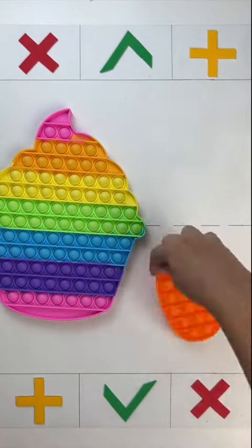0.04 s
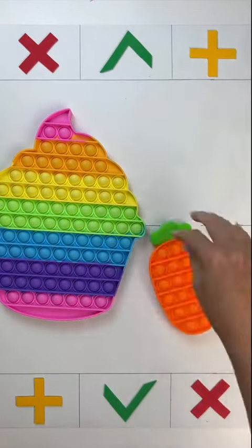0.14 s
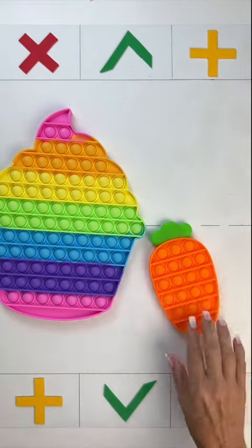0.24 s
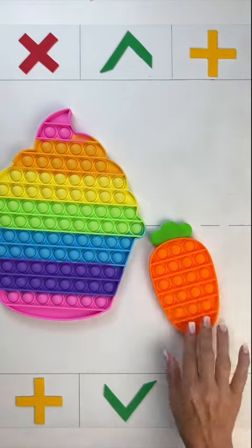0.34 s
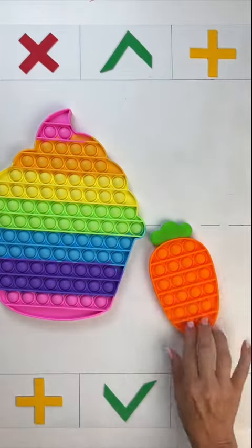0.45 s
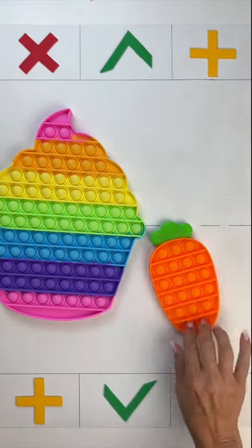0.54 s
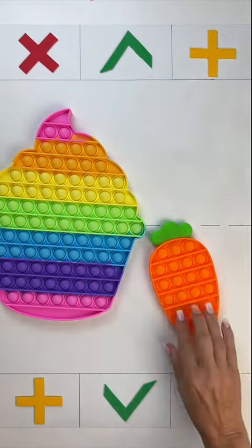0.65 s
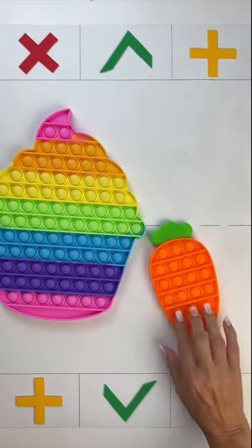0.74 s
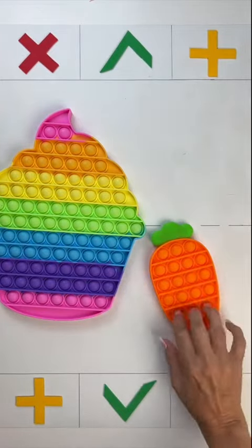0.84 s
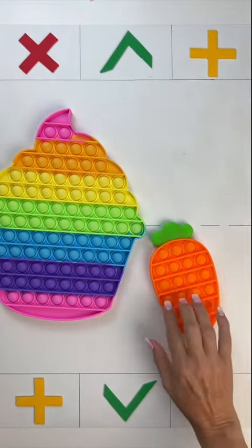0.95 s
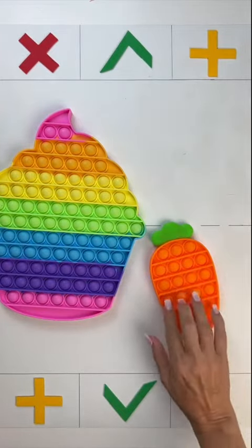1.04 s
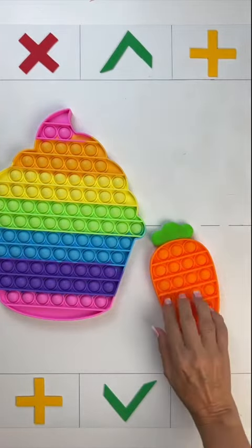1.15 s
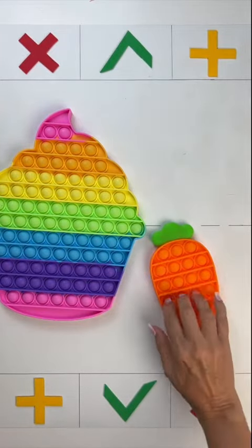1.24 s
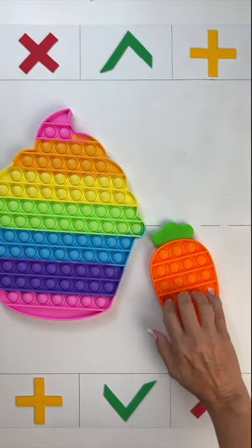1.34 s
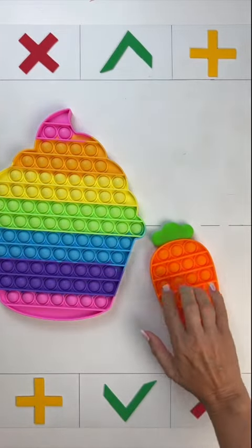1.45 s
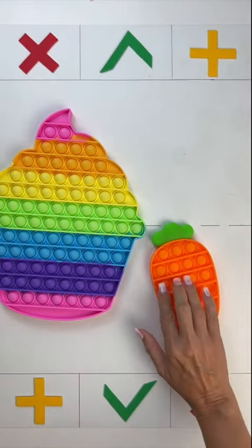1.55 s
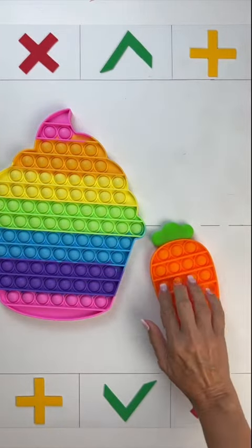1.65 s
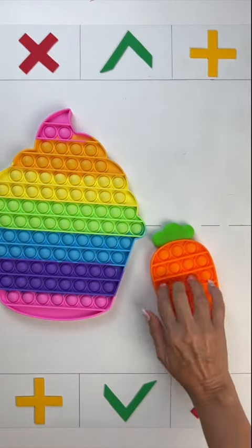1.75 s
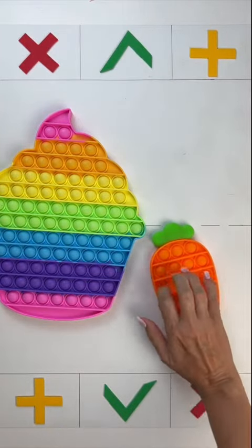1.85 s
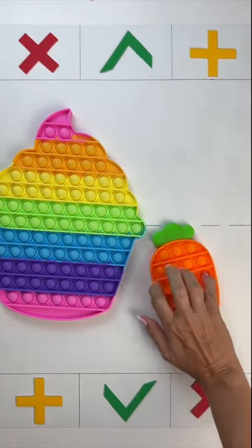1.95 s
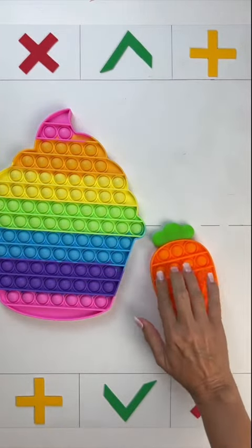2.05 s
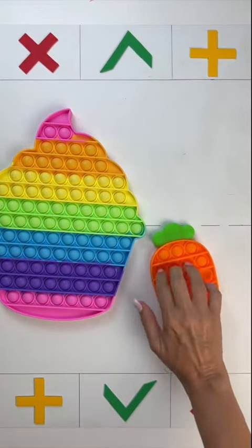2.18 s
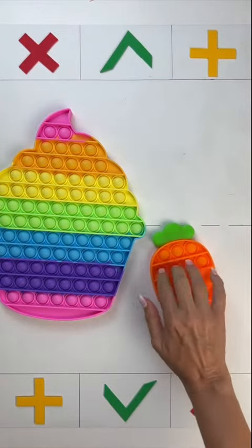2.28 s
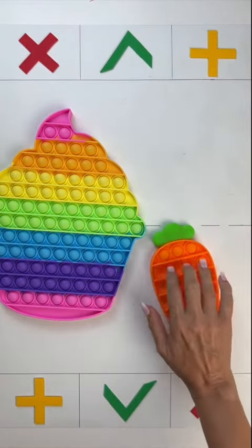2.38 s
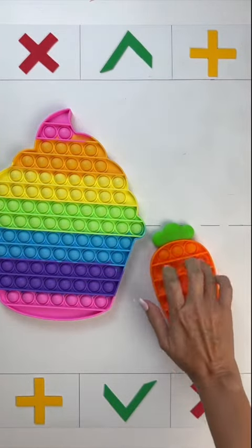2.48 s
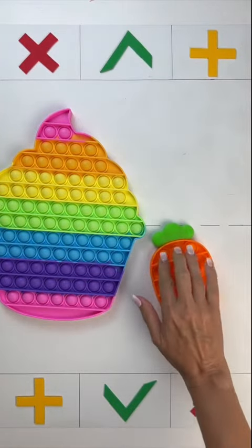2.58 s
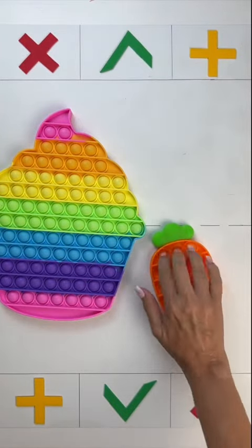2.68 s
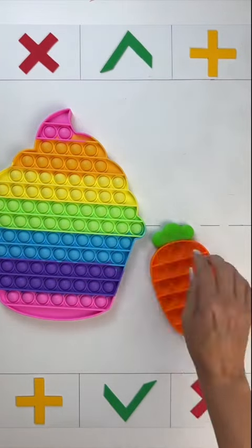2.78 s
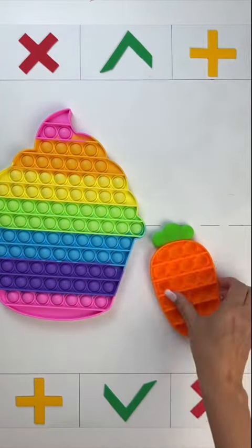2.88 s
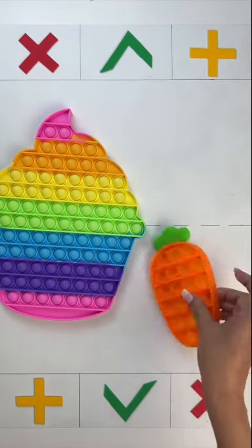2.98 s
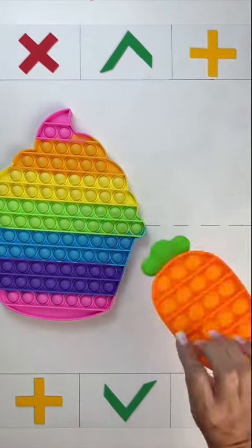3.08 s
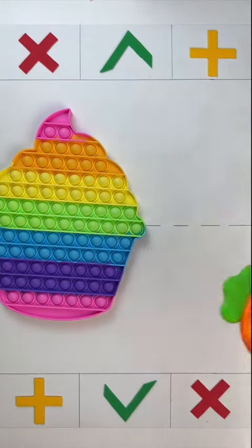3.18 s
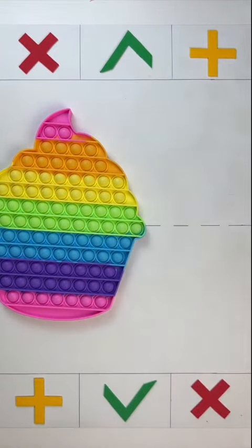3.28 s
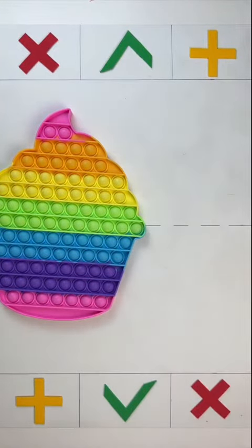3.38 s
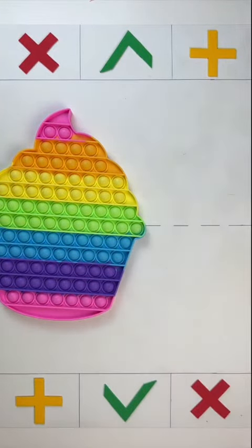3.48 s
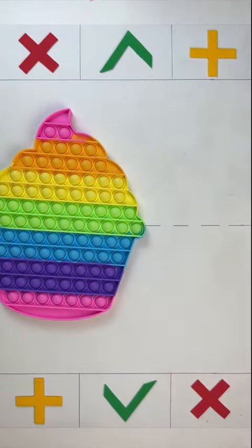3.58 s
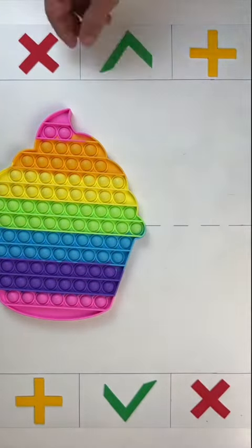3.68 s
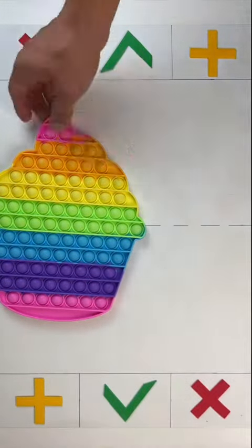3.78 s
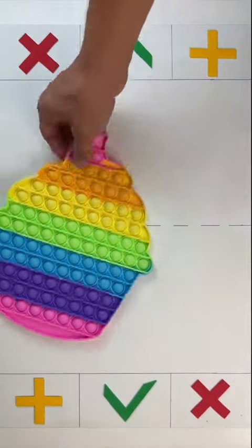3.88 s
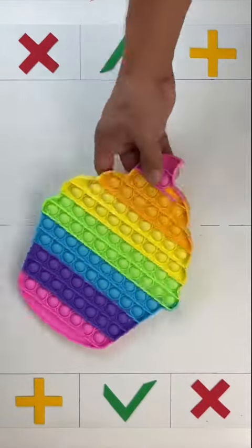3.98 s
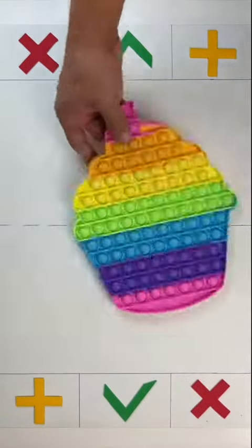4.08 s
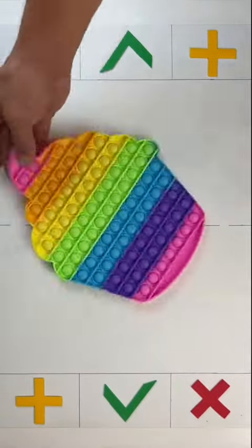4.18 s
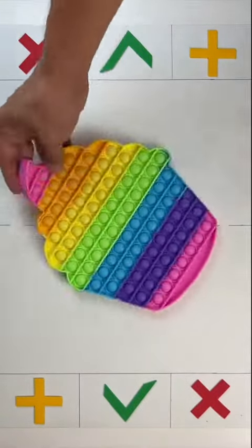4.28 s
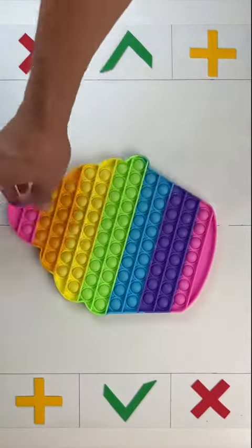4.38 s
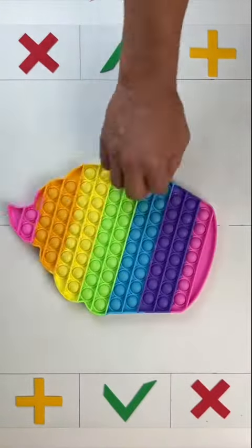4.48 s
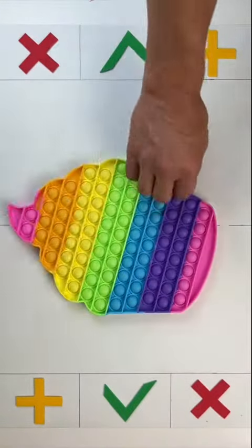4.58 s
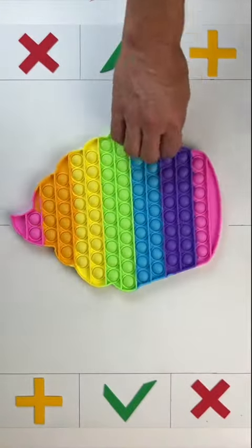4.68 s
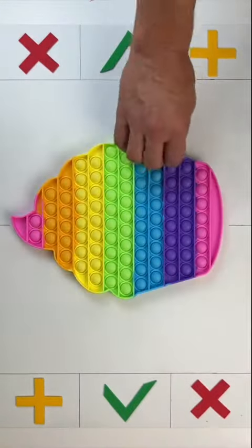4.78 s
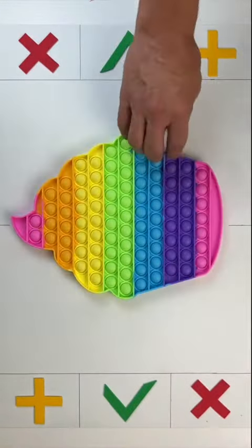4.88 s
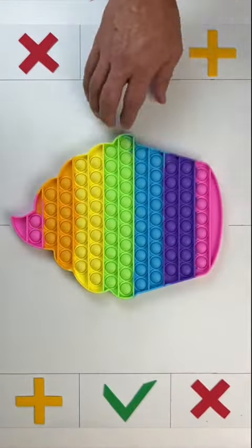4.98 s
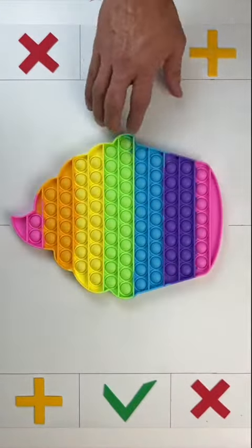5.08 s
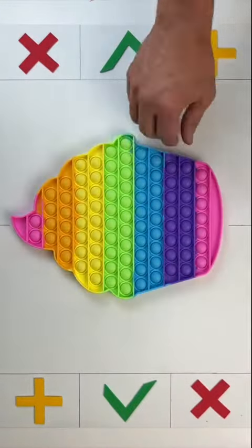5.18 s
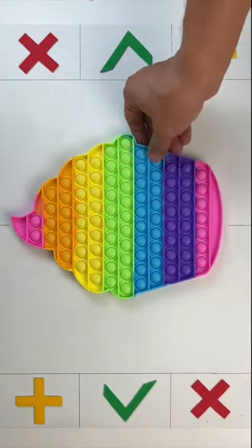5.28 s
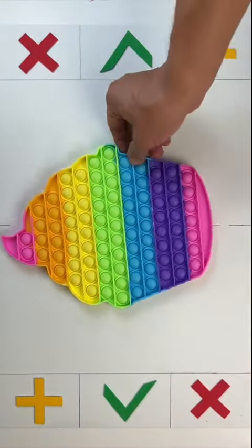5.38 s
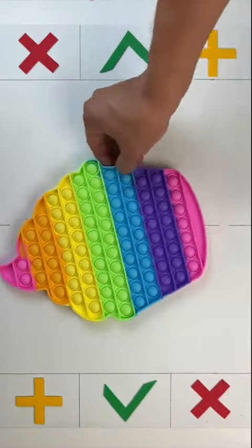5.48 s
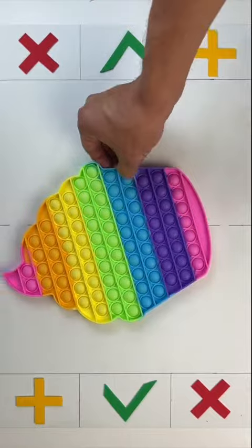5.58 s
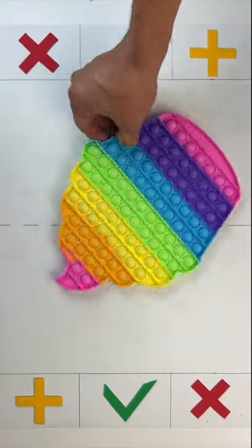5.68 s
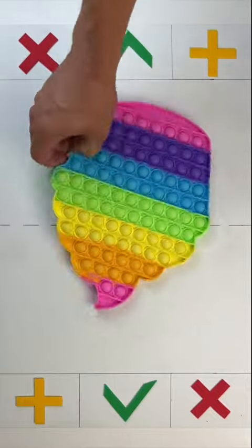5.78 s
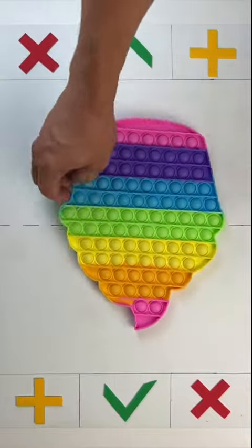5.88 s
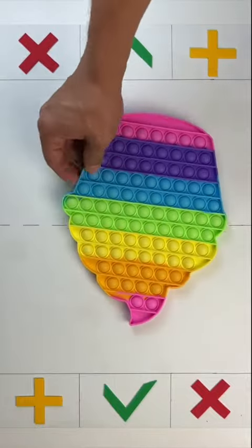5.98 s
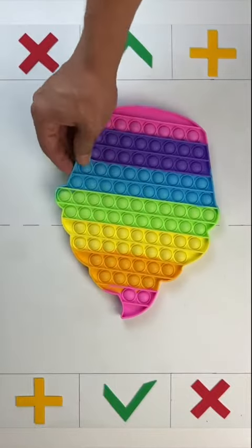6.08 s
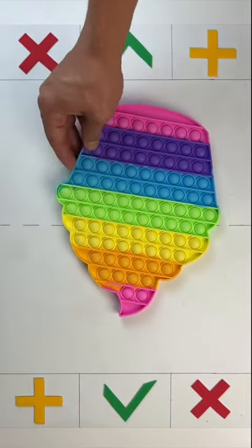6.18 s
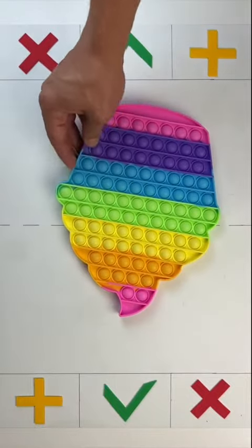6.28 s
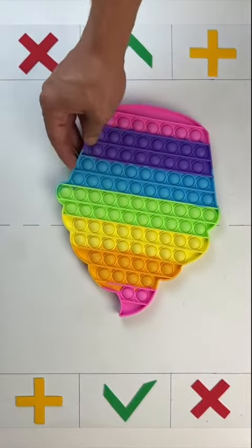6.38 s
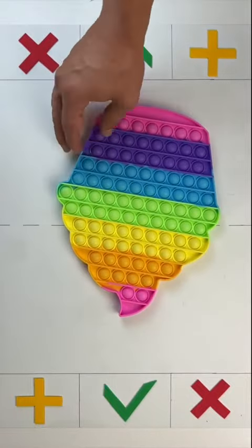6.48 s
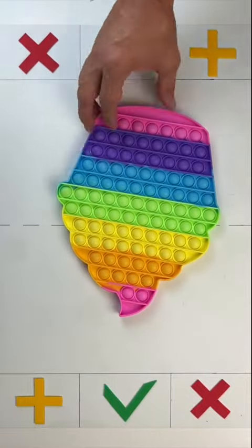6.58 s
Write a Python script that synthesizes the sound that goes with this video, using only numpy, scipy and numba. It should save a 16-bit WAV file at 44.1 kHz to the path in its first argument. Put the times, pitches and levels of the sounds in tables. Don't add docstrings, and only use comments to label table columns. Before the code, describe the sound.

From 0 to 2.7 seconds, silicone bubbles on a tabletop are pressed close to a phone: loud, sharp, dry pops, starting at once, then roughly every quarter to third of a second, many doubled into tight clusters. Softer fingertip thuds knock the board between them. At about 2.95 the toy lets go with a click, a brief falling rubbery chirp and tiny nail ticks. From 3.2 to 3.75 it is nearly quiet, with faint cloth rustles and small ticks. From 3.8 to 4.5 a large rubbery sheet drags in rough hollow scuffs, with sharp slaps near 4.3 to 4.4, then lighter rubs and edge knocks until 4.8. After a lull, a thump comes at 5.2, then short chirps and rubs, a strong squeak around 5.65, and higher chirps from 5.8 to 6.05. Final slaps fall near 6.4 and a faint crack at 6.6. A low fan-like hum continues in a small room.

```python
import sys
import numpy as np
from scipy import signal
from scipy.fft import rfft, irfft
from scipy.io import wavfile
from scipy.ndimage import uniform_filter1d
from numba import njit

SR = 44100
rng = np.random.default_rng(int(sys.argv[2]) if len(sys.argv) > 2 else 0)


def unload_wav(signal):
    wavfile.write(
        sys.argv[1],
        SR,
        np.round(np.clip(np.atleast_2d(signal).T, -1, 1) * 32767).astype(np.int16),
    )


def magnitude_from_level(level_db):
    exponent = np.asarray(level_db, float) / 20
    return 10 ** exponent


N = 292824
TIME = np.arange(N) / SR

# f/Hz, level/dB, t60/s
BOARD = [(161.6, -19, 0.45), (265.6, 1.5, 0.12), (401, 2, 0.07), (563.3, -12.5, 0.11), (797.7, -8, 0.054),
         (910, -1, 0.14), (1170, -10, 0.013), (1630, -23, .03), (1800, -12, 0.031)]
MID_SIDE = np.array([[1], [-1]])


def colour(points, hz):
    p = np.array(points)
    return magnitude_from_level(np.interp(np.log(hz + 1), np.log(p[:, 0]), p[:, 1]))


def unit(x):
    return x / np.sqrt(np.mean(x ** 2))


def shaped(points, x):
    return unit(irfft(rfft(x) * colour(points, np.fft.rfftfreq(N, 1 / SR)), N))


def band(x, hz, width_hz):
    return signal.lfilter(*signal.iirpeak(min(hz, .45 * SR), hz / width_hz, SR), x)


def add(out, s, x):
    i = int(s * SR)
    out[i:i + len(x)] += x[:N - i]


def walk(size):
    return unit(uniform_filter1d(uniform_filter1d(rng.standard_normal(N), size), size))


def strokes(rows, rise_db_s, fall_db_s, rest_db):
    s, hold, db = np.transpose(rows)[:3, :, None]
    t = TIME[::32]
    before, after = np.maximum(s - t, 0), np.maximum(t - s - np.abs(hold), 0)
    each = db - rise_db_s * before - fall_db_s * after
    level = np.repeat(np.maximum(each.max(axis=0), rest_db), 32)[:N]
    return uniform_filter1d(level, size=200), np.repeat(each.argmax(axis=0), 32)[:N]


def background():
    # f/Hz, level/dB
    air_tone = [(25, -33), (50, -20.5), (90, -19), (200, -5), (400, -3), (630, -11.5), (1000, -21),
                (1650, -36), (2500, -33), (4000, -31.5), (6300, -27.5), (8000, -36.5), (13000, -35),
                (16000, -42)]
    # f/Hz, width/Hz, level/dB
    hum_bands = [(143, 30, -50), (301, 14, -60.5)]
    # t/s, hold/s, level/dB
    rustle_moves = [(3.1, .002, -68), (3.358, .004, -61.5), (3.39, 0.076, -69), (3.6, 0.013, -64),
                    (3.64, 0.17, -65), (3.76, 0.018, -58.5), (4.84, .005, -61.5), (4.87, .13, -66.5),
                    (5.034, .004, -60.5), (5.222, 0.0053, -57), (5.3, .004, -64), (6.408, 0.0056, -55.5),
                    (6.56, 0.0036, -71), (6.606, 0.011, -64)]
    air_db = -70.5

    hz = np.fft.rfftfreq(N, 1 / SR)
    width_tone = [(50, -15.5), (150, -36), (400, -20.5), (700, -5.5), (1300, 15), (4000, -0.5), (15000, -2)]
    mid, side = (rfft(rng.standard_normal(N)) * colour(air_tone, hz) for _ in range(2))
    scale = magnitude_from_level(air_db) / np.std(irfft(mid * (hz > 500), N))
    air = irfft(mid, N) + irfft(side * colour(width_tone, hz), N) * MID_SIDE

    hum = 0
    for f, width, db in hum_bands:
        hum = hum + magnitude_from_level(db) * unit(band(band(rng.standard_normal(N), f, width), f, 2 * width))

    cloth_tone = [(500, -16.5), (1500, -10.5), (4000, -5.5), (8000, -12.5), (11000, -10.5), (15000, -15.5)]
    grains = rng.standard_normal((2, N)) * magnitude_from_level(1.0 * rng.exponential(size=N))
    cloth_mid, cloth_side = (shaped(cloth_tone, g) for g in grains)
    rustle_db, _ = strokes(rustle_moves, rise_db_s=1500, fall_db_s=498, rest_db=-95.5)
    rustle = magnitude_from_level(rustle_db + 2.8 * walk(size=400)) * (cloth_mid + .5 * cloth_side * MID_SIDE)
    return magnitude_from_level(2.0 * walk(size=3000)) * scale * air + hum + rustle


def board(weights, t, detune=1):
    hz, db, t60 = np.transpose(BOARD)[:, :, None]
    t60 = np.minimum(t60, 45 / hz)
    return np.dot(weights, magnitude_from_level(db) * np.sin(2 * np.pi * hz * detune * t) * 1000 ** (-t / t60))


def knocks():
    # t/s, peak level/dB, crack level/dB, board thud level/dB, dome ring f/Hz
    pops = [(0.032, -10, -27, -11.5, 1410), (0.107, 2, -20.5, -8, 1251), (0.107, -6.5, -15, -10, 3220),
            (0.442, -15.5, -16.5, -14.5, 902), (0.488, -8, -11, -13, 1790), (0.788, 0.5, -9.5, -26.5, 1790),
            (0.7976, -6, -21, -9, 1600), (1.138, -18.5, -19.5, -4, 1080), (1.147, -2, -10, -21, 1810),
            (1.153, -2.5, -26.5, -14, 1770), (1.1663, -9.5, -4, -42.5, 1540),
            (1.382, -3.5, -10.5, -25, 2640), (1.653, -18, -39, -12.5, 1070),
            (1.662, -8.5, -26.5, -14.5, 1690), (1.667, -2, -9.5, -15, 1930),
            (1.671, -9.5, -16.5, -28.5, 902), (1.9283, -7, -9.5, -22, 1790),
            (2.168, -11.5, -27.5, -7.5, 1100), (2.176, 2, -12, -18, 1740), (2.181, -5, -11.5, -10.5, 1800),
            (2.416, 1, -11, -29, 1770), (2.424, -23.5, -29.5, -5, 1650), (2.68, -1, -12.5, -19, 2050),
            (2.689, -2.5, -14.5, -9.5, 912)]
    # t/s, peak level/dB, board thud level/dB
    taps = [(0.264, -33.5, -3.5), (0.472, -19, -12), (0.647, -41.5, 2.5), (0.77, -30.5, 3.5),
            (0.776, -26.5, 4), (0.958, -37, -1), (1.091, -45.5, 2), (1.131, -27.5, 3), (1.36, -21.5, -23.5),
            (1.502, -35, -3.5), (1.562, -56, 14), (1.877, -61, 19.5), (1.908, -20, -19), (2.003, -38, 1.5),
            (2.03, -22, -5), (2.099, -51.5, -6), (2.161, -21, 2), (2.412, -23, -11), (2.535, -38.5, 0.5),
            (2.67, -20.5, 3), (2.835, -25.5, 4.5), (2.853, -23, -5.5)]
    # t/s, peak level/dB, crack level/dB, board thud level/dB, ring f/Hz
    slaps = [
        (4.288, -6, -36, -58.5, 1900),
        (4.365, -5.5, -34.5, -29, 1520),
        (4.384, -20, -27, -3, 1600),
        (4.396, -20.5, -11.5, -42, 900),
        (4.683, -26, -49, 5, 1320),
        (4.783, -16, -23.5, -7, 920),
        (5.223, -49.5, -17, 22.5, 910),
        (6.421, -8, -54, -41, 1504),
        (6.425, -12.5, -19.5, 0, 987),
        (6.608, -53.5, -5, -12, 1640),
    ]
    # f/Hz, level/dB
    knock_tone = [(180, -39), (300, 4.5), (1190, 3), (1900, 1.5), (2400, -3), (3520, -4), (4090, -12.5),
                  (4520, -10.5), (5900, -16.5), (6520, -23.5), (7440, -23.5), (10600, -29.5), (16000, -40)]
    tap_crack_db, tap_ring_hz = -26, 910
    pop_rattle_db, tap_rattle_db, slap_rattle_db = -27.5, -24.5, -23
    toy_thin_hz, slap_thin_hz = 60, 602
    sheet_damp_s = 0.025

    out, size, lead = np.zeros(N), 8192, 128
    hz, t = np.fft.rfftfreq(size, 1 / SR) + 1, np.arange(size) / SR
    low = np.array(BOARD)[:, 0] < 600
    end = np.minimum((size - np.arange(size)) / 1500, 1)
    hits = [(s, db, tap_crack_db, thud_db, tap_ring_hz, tap_rattle_db, toy_thin_hz) for s, db, thud_db in taps]
    hits += [(*pop, pop_rattle_db, toy_thin_hz) for pop in pops]
    hits += [(*slap, slap_rattle_db, slap_thin_hz) for slap in slaps]
    for s, db, crack_db, thud_db, ring_hz, rattle_db, thin_hz in sorted(hits):
        chance, scatter = rng.standard_normal((3, len(BOARD))), rng.standard_normal(size)
        tone = colour(knock_tone, hz) * magnitude_from_level((crack_db + 24) * np.clip(np.log2(hz / 1500) / 2.5, 0, 1))
        dome = 2.0 / (1 + 1j * (hz - ring_hz) / 200)
        dome_overtone = .8 / (1 + 1j * (hz - 1.6 * ring_hz) / 300)
        tone = tone * (1 + dome + dome_overtone)
        fizz = 1.8 / (1 + ((hz - 13800) / 1500) ** 4)
        tone = tone * (1 + fizz) / (1 + (thin_hz / hz) ** 4)

        lag = .0045 * (1 + .1 * chance[2, 0]) * (600 / (np.minimum(hz, 3500) + 100)) ** .7
        lag = lag - .0005 + lead / SR
        rattle_fade = np.exp(-t / 0.0028) + 0.28 * np.exp(-t / 0.018)
        rattle = rfft(magnitude_from_level(rattle_db - 0.23 * db + 2.0) * scatter * rattle_fade)
        paths = 1 / (1 + (hz / 9000) ** 2) + (1.1 + hz / 12000) * rattle
        snap = irfft(tone * paths * np.exp(-2j * np.pi * np.cumsum(lag) * SR / size), size)

        late = np.maximum(t - lead / SR - .003, 0)
        spot = 1 + .3 * chance[0]
        weights = spot * np.where(low, magnitude_from_level(thud_db - 1.5), magnitude_from_level(0.85 * thud_db + 0.5))
        detune = 1 + 0.1 * chance[1, :, None] * ~low[:, None]
        thud = board(weights, late, detune) * (1 - np.exp(-late / 0.002))
        if thin_hz == slap_thin_hz:
            thud = thud * np.exp(-late / sheet_damp_s)
        add(out, s - lead / SR, magnitude_from_level(db) * end * (snap / np.abs(snap).max() + thud))
    return out


def room(dry):
    # f/Hz, level/dB, t60/s, stereo width
    tail_bands = [(322.7, -7, 0.19, .1), (700, -22.5, 1, .3), (1400, -9, 0.21, .9),
                  (2875, -10.5, 0.23, 1.2), (5340, -16, 0.31, 0.56), (9000, -11, 0.2, 1.1),
                  (13500, -7, 0.12, 1.1)]
    t, out = TIME[:int(.4 * SR)], np.zeros((2, N))
    step, overlap = 13000, 500
    for start in range(0, N, step):
        mid, side = 0, 0
        for hz, db, t60, width in tail_bands:
            fade = 1000 ** (-t / t60) + 0.15 * np.exp(-t / 0.0016)
            fade = magnitude_from_level(db) * fade * np.clip((t - .003) / 0.015, 0, 1) / np.sqrt(t60 * SR / 14)
            noises = (band(band(rng.standard_normal(len(t)), hz, hz), hz, hz) for _ in range(2))
            m, d = (unit(noise) * np.sqrt(hz / SR) for noise in noises)
            mid, side = mid + fade * m, side + width * fade * d
        piece = dry[start:start + step + overlap]
        n = np.arange(len(piece))
        piece = piece * np.clip(np.minimum(n, step + overlap - n) / overlap, 0, 1)
        for ear, sign in zip(out, (1, -1)):
            add(ear, (start + .5) / SR, signal.fftconvolve(piece, mid + sign * side))
    return out


def ticks():
    # t/s, peak level/dB, f/Hz
    clicks = [
        (2.9488, -18, 4530),
        (3.0514, -36, 5440),
        (3.0598, -24, 4260),
        (3.086, -37, 4700),
        (3.0992, -28, 4160),
        (3.356, -38.5, 2420),
        (3.4665, -43, 4820),
        (5.0386, -37, 2040),
    ]
    # t/s, level/dB, first f/Hz, last f/Hz, glide/s, fade/s
    peel = (2.977, -23, 1330, 1075, .004, .007)
    out, t = np.zeros(N), TIME[:4000]
    for s, db, hz in clicks:
        click = np.sin(2 * np.pi * hz * t) * np.exp(-t / 0.00054)
        grit = 0.061 * band(rng.standard_normal(len(t)), hz, hz) * np.exp(-t / 0.012)
        add(out, s, magnitude_from_level(db - 6.5) * (click + grit))
    add(out, clicks[0][0] + 0.0045, magnitude_from_level(-41.0) * board(np.ones(len(BOARD)), t))

    s, db, first_hz, last_hz, glide, fade = peel
    waver = 1 + .03 * walk(size=60)[:len(t)]
    phase = 2 * np.pi * np.cumsum((last_hz + (first_hz - last_hz) * np.exp(-t / glide)) * waver) / SR
    hold = np.exp(-t / fade) + .22 * np.exp(-t / (4.5 * fade))
    chirp = (np.sin(phase) + .08 * np.sin(2 * phase)) * hold * magnitude_from_level(3 * walk(size=90)[:len(t)])
    chirp = chirp + .04 * np.sin(3 * phase) * np.exp(-t / fade)
    add(out, s, magnitude_from_level(db) * chirp * np.minimum(t / glide, 1))
    return out


@njit
def svf(x, hz, sharp):
    y, b, l = np.empty(len(x)), 0., 0.
    for i in range(len(x)):
        g = np.tan(np.pi * hz[i] / SR)
        v = (b + g * (x[i] - l)) / (1 + g * (g + 1 / sharp))
        b, l, y[i] = 2 * v - b, l + 2 * g * v, v / sharp
    return y


def drags():
    # t/s, hold/s, rub level/dB, cavity f/Hz
    rubs = [(3.794, 0.0082, -30, 1338), (3.804, 0.089, -22.5, 1346), (3.936, 0.0064, -21, 1310),
            (3.977, 0.023, -20, 1537), (3.997, 0.024, -22.5, 1604), (4.067, .06, -29.5, 1310),
            (4.117, 0.015, -18, 1440), (4.145, 0.0021, -20.5, 826), (4.164, 0.018, -33, 866),
            (4.209, 0.0038, -23.5, 867), (4.249, 0.04, -19, 1295), (4.304, 0.043, -34.5, 1250),
            (4.392, 0.022, -23.5, 1257), (4.458, 0.056, -41, 977), (4.632, .003, -39.5, 1280),
            (4.664, 0.019, -30, 1430), (4.636, .02, -35, 1280), (4.788, .004, -30.5, 967),
            (4.714, .04, -47, 1000), (5.308, 0.02, -39.5, 1055), (5.375, 0.046, -37.5, 963),
            (5.465, 0.023, -38.5, 772), (5.585, 0.028, -30, 1385), (5.614, 0.08, -17, 1350),
            (5.699, .005, -19.5, 1340), (5.722, 0.036, -31.5, 1160), (4.617, .01, -36.5, 1150),
            (5.809, .005, -29.5, 1350), (5.84, 0.014, -30.5, 1320), (5.985, 0.054, -33, 1069)]
    # f/Hz, level/dB
    hiss_tone = [(1200, -36.5), (2000, 5), (3000, -8.5), (4500, -7.5), (6000, -14), (7000, -21.5),
                 (11500, -29), (12500, -31.5), (15500, -34), (16500, -59)]
    # ratio to the cavity f, sharpness, level/dB
    cup_modes = [(1.019, 11.0, 5.0), (.68, 8.4, -3.5), (.45, 16.0, -10.5),
                 (1.33, 8.5, -0.5), (1.8, 4.1, -7.0), (2.3, 1.5, -16.5)]
    firm_db = -25
    lifted_s, lifted_db = 5.56, -5

    slips = (rng.random(N) < 5000 / SR) * magnitude_from_level(0.51 * rng.exponential(size=N)) * rng.choice([-1, 1], N)
    slips = unit(slips)
    rub_db, leading = strokes(rubs, rise_db_s=1148, fall_db_s=505, rest_db=-120)
    cup_hz = uniform_filter1d(np.array(rubs)[leading, 3], size=400)
    cups = 0
    for ratio, sharp, db in cup_modes:
        moving_hz = cup_hz * ratio * (1 + 0.069 * walk(size=900))
        cup_db = db + lifted_db * (ratio < 1) * (TIME > lifted_s) + 3.9 * walk(size=120)
        cups = cups + magnitude_from_level(cup_db) * unit(svf(svf(slips, moving_hz, sharp), moving_hz, sharp / 2))

    ring = signal.fftconvolve(slips, board(np.ones(len(BOARD)), TIME[:8192]))[:N]
    low = unit(band(ring, 612, 316))
    high = unit(band(band(ring, 1100, 1200), 1100, 1200))
    hiss = shaped(hiss_tone, 1.1 * slips + rng.standard_normal(N)) * magnitude_from_level(0.88 * walk(size=80))
    body = unit(unit(cups) + .35 * high)

    effort_db = rub_db - firm_db
    gate = 1 / (1 + magnitude_from_level(-60 - rub_db))
    hiss = magnitude_from_level(-11.5 + 0.99 * effort_db) * hiss
    low = magnitude_from_level(-13 + .6 * effort_db) * gate * low
    return magnitude_from_level(rub_db) * body + magnitude_from_level(firm_db) * (hiss + low)


def squeaks():
    # t/s, length/s, slip f/Hz, level/dB, strongest f/Hz
    squeals = [
        (5.376, 0.019, 464, -24, 1060),
        (5.405, 0.014, 529, -32.5, 1270),
        (5.639, 0.086, 414, -28.5, 424),
        (5.631, 0.074, 396.4, -21.5, 1320),
        (5.802, 0.03, 685, -27.5, 1400),
        (5.842, 0.028, 646, -28, 1330),
        (5.877, 0.054, 657, -45, 1270),
        (6.013, 0.039, 513, -27.5, 1400),
        (6.158, 0.037, 655, -48, 800),
    ]
    out, waver = np.zeros(N), 1 + 0.038 * walk(size=100)
    for s, length, hz, db, top_hz in squeals:
        t = np.arange(int(2 * length * SR)) / SR
        phase = 2 * np.pi * np.cumsum(hz * waver[int(s * SR):][:len(t)]) / SR
        stack = 0
        for k in range(1, 8):
            stack = stack + np.sin(k * phase + k * k) / (1 + ((k * hz - top_hz) / 400) ** 2)
        envelope = np.minimum(t / 0.0023, 1) * np.exp(-np.maximum(t / length - .7, 0) / 0.22)
        add(out, s, magnitude_from_level(db) * unit(stack) * envelope)
    return out


def phone_ports(direct):
    scatter = unit(rng.standard_normal(600) * np.exp(-TIME[:600] / .004)) / np.sqrt(600)
    treble = signal.butter(2, 1000, "high", fs=SR)
    return magnitude_from_level(-23.5) * signal.lfilter(*treble, signal.fftconvolve(direct, scatter)[:N]) * MID_SIDE


def scene():
    near = knocks() + ticks()
    rub = drags() + squeaks()
    direct = near + rub
    return direct + phone_ports(direct) + room(magnitude_from_level(0.5) * near + magnitude_from_level(1.0) * rub) + background()


def roll_off(x):
    return signal.sosfilt(signal.butter(12, 16510, fs=SR, output="sos"), x)


def record(dry):
    top_cut = signal.ellip(8, .2, 60, 15900, fs=SR, output="sos")
    flattened = 1.458 * np.tanh(dry / 1.066)
    mix = np.clip(signal.sosfilt(top_cut, flattened), -1, 1)
    return roll_off(mix)


dry = scene()
out = record(dry)
unload_wav(out)
```